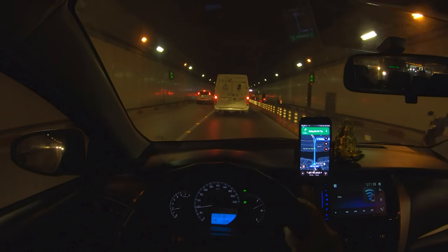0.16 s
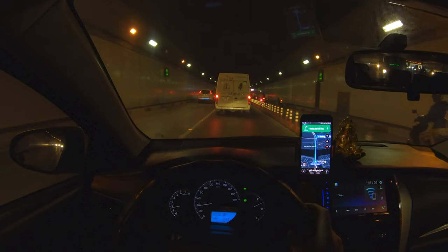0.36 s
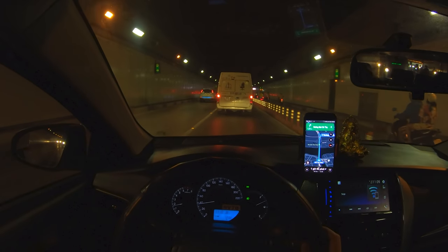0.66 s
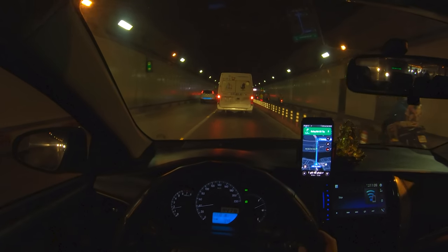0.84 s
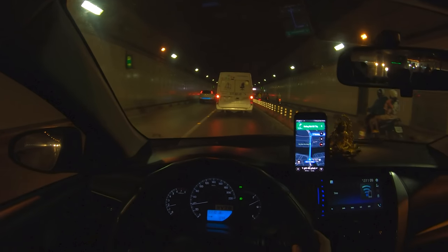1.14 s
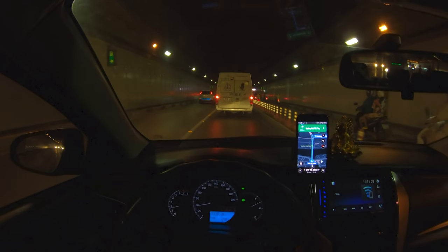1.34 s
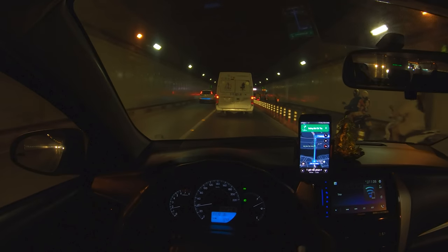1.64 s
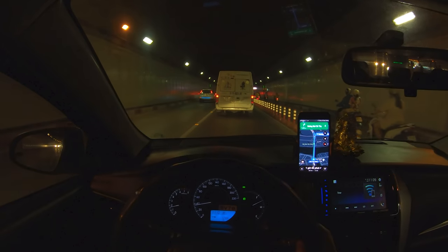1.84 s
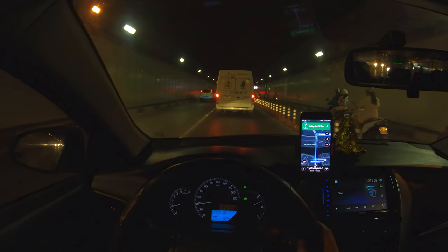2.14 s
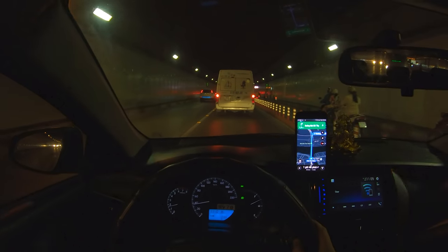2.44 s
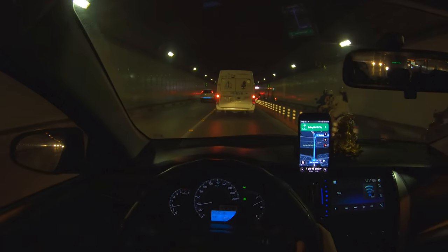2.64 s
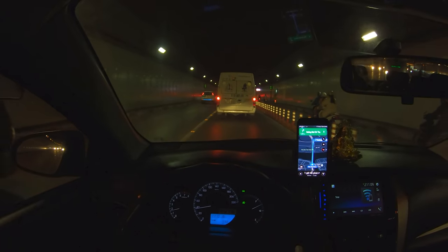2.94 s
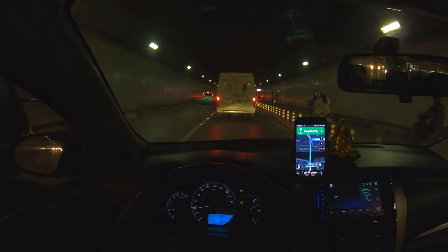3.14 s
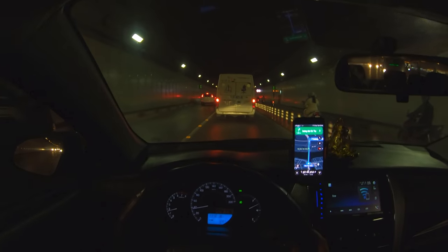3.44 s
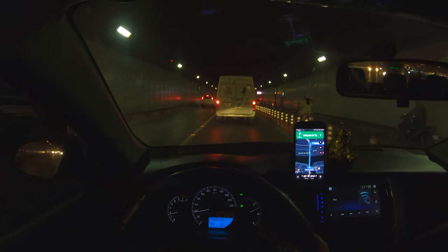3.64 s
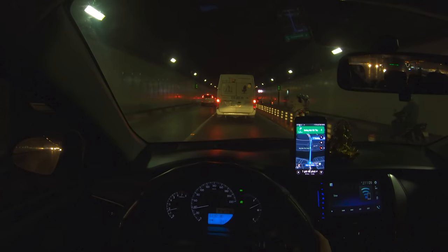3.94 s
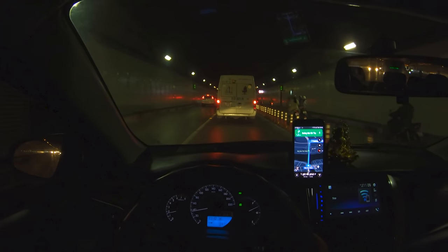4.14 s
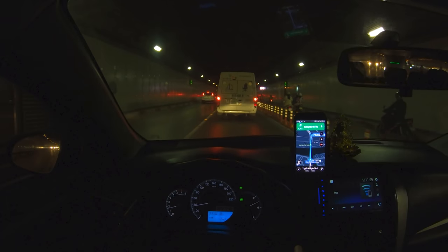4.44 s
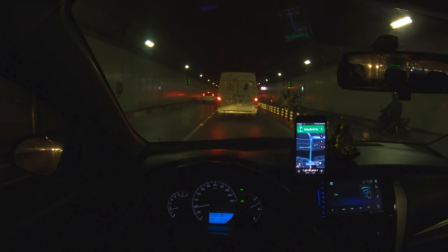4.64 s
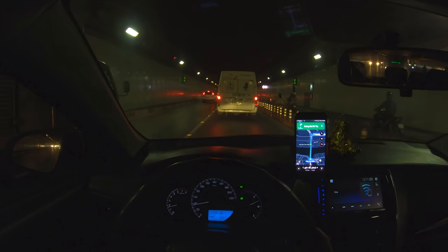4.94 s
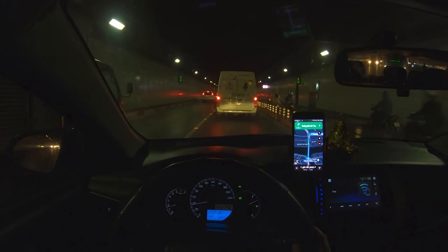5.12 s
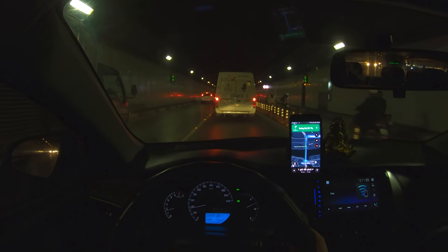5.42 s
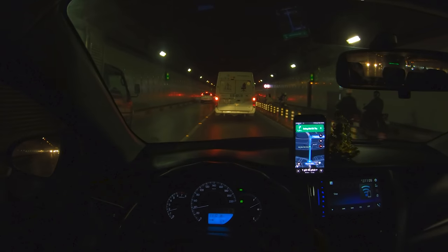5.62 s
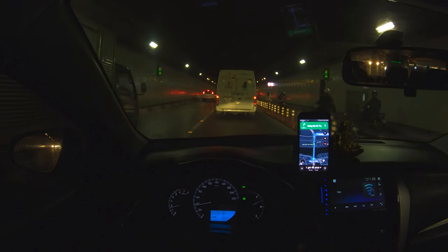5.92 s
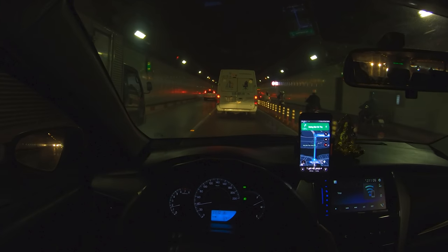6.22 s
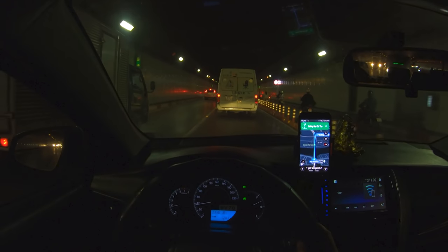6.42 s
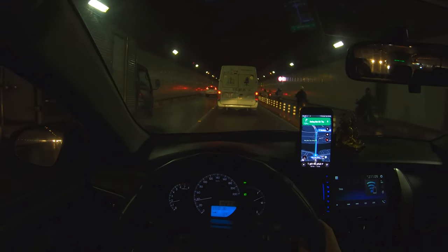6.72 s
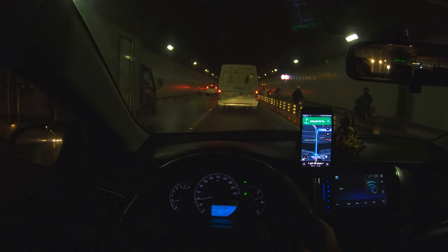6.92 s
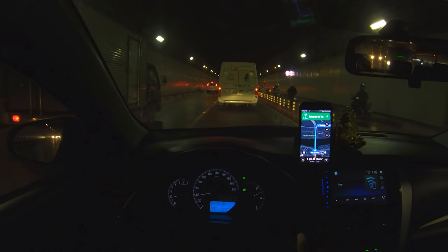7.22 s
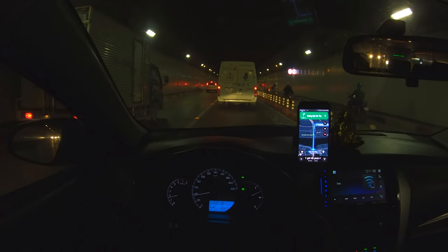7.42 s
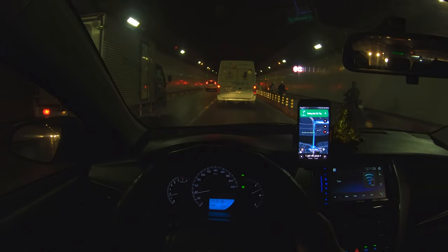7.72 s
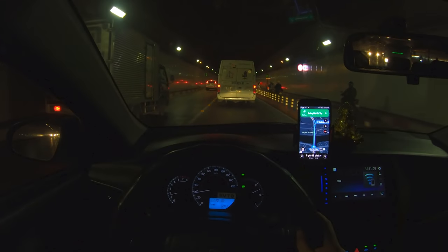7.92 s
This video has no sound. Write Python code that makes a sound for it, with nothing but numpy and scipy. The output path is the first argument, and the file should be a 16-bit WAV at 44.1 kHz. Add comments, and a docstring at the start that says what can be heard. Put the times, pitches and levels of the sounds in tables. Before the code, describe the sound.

Inside a closed car cruising through a road tunnel, deep cabin boom and tyre rumble dominate over a low engine drone and faint wavering hum.

```python
"""A car rolls through a damp road tunnel, heard from the driver's seat with the windows shut.
The road shakes body and cabin resonances into a boom, and noise shaped as tyre rumble lies over it.
The engine is a low drone of sine orders; shaped noise makes the traffic's roar in the tube and the tread's growl and hiss.
A fan, probably the tunnel's ventilation, hums in swells as a blade tone smeared by echoes, with overtones and a rush
of air that fade. Fluttering noise bands make the spray, and swishes, sloshes and drops where the road is wet."""
import sys
import numpy as np
from scipy.fft import rfft, irfft, next_fast_len
from scipy.io import wavfile
from scipy.ndimage import uniform_filter1d, minimum_filter1d, map_coordinates

SR = 44100
rng = np.random.default_rng(int(sys.argv[2]) if len(sys.argv) > 2 else 0)


def generate_wav(sig):
    """Save sig (samples, or channels by samples) to the path in sys.argv[1] as 16-bit PCM at SR."""
    pcm = np.round(np.clip(np.atleast_2d(sig).T, -1, 1) * 32767).astype(np.int16)
    wavfile.write(sys.argv[1], SR, pcm)


N = 355887

# Dampness of the road. Each row: time in seconds, lift it gives the fine spray in dB.
DAMPNESS = [(0, 1.5), (1.1, 1), (1.6, 3.5), (2.05, 3), (2.28, 6), (2.37, -.5), (2.47, 2.5), (3, 4.5),
            (3.7, 3.5), (4.1, -0.5), (5.3, 4), (6, 1.5), (6.7, 4), (7.8, 1.5)]
# Wet patches under the tyres. Each row: start in seconds, length in seconds, spray level in dB, swish level in dB.
WET_PATCHES = [(1.256, 0.026, -72, -61), (1.315, 0.018, -71.5, -63), (1.53, .04, -76, -66),
               (1.605, .025, -72, -67), (1.78, .012, -73, -71), (2.12, 0.086, -70, -65),
               (2.22, .04, -70, -63), (2.295, .016, -71, -67), (2.425, .03, -71, -68),
               (2.543, 0.066, -71, -67.5), (2.71, .05, -78, -66), (2.775, 0.049, -68, -64),
               (3.16, .025, -67, -74), (3.22, .02, -69, -72), (3.34, .09, -76, -72),
               (3.573, .26, -75.5, -70.5), (5.66, .16, -74, -77), (6.077, .035, -73.5, -72),
               (6.359, 0.28, -72.5, -72), (6.81, .04, -69, -70.5), (6.89, 0.038, -71, -70.5),
               (7.09, 0.24, -73, -71), (7.47, 0.091, -70, -69), (7.96, .1, -74, -78)]
# time a tyre takes to run into a patch, and decay time of its water afterwards (s)
PATCH_RISE_S, PATCH_TAIL_S = 0.013, 0.02


def amp(db):
    """Decibels to gain."""
    return 10 ** (np.asarray(db) / 20)


def unit(x):
    """Scale to rms 1."""
    return x / np.sqrt(np.mean(np.abs(x) ** 2) + 1e-20)


def curves(rows):
    """One value per sample for each column after the time."""
    seconds, *columns = np.transpose(rows)
    return [np.interp(np.arange(N) / SR, seconds, column) for column in columns]


def wobble(rate):
    """A smooth random curve at rms 1, with rate knots a second."""
    knots = rng.standard_normal(int(N * rate / SR) + 4)
    return unit(map_coordinates(knots, [np.arange(N) * rate / SR]))


def filtered(x, response):
    """x passed through a response given as a function of frequency in Hz."""
    size = next_fast_len(N + SR // 2)
    spectrum = rfft(x, size) * response(np.fft.rfftfreq(size, 1 / SR))
    return irfft(spectrum, size)[:N]


def coloured(x, spectrum):
    """x shaped by (Hz, dB) points on a log frequency axis, at rms 1."""
    points_hz, points_db = np.transpose(spectrum)

    def response(hz):
        return amp(np.interp(np.log(hz + 1), np.log(points_hz), points_db, left=-120, right=-120))

    return unit(filtered(x, response))


def steadied(x, seconds):
    """x with its swells longer than the given time evened out by its running rms."""
    power = np.abs(uniform_filter1d(x * x, int(seconds * SR) + 1))
    return x / np.sqrt(power + 1e-9)


def swells(rows, rise_s, tail_s):
    """Gain of (start s, length s, dB) events that rise, hold and die away, added by power."""
    t = np.arange(0, N, 20) / SR  # every 20th sample is enough
    power = 0
    for start, length, db in rows:
        rise = np.clip(0.5 + (t - start) / rise_s, 0, 1)  # half way up at the start time
        decay = np.exp(-np.clip((t - start - length) / tail_s, 0, 20))
        power = power + (amp(db) * rise * decay) ** 2
    return np.interp(np.arange(N) / SR, t, np.sqrt(power))


def echoes(phase, spread_hz, direct):
    """A tone plus its many reflections, each Doppler-shifted a little by the car's motion: a random fading sum."""
    scatter = unit(wobble(2 * spread_hz) + 1j * wobble(2 * spread_hz))
    return unit(np.real((direct + scatter) * np.exp(1j * phase)))


def bass_swing_db():
    """Swing of the deep bass about its mean, shared by cabin boom and engine drone."""
    # Each row: time in seconds, deep bass level in dB (only the swing about the mean counts).
    bass_level = [(0, -20.5), (1.02, -20), (1.42, -24.5), (1.75, -20), (2.2, -14.5), (2.45, -21.5),
                  (2.95, -18.5), (3.22, -21), (3.82, -17), (4.23, -21.5), (4.47, -15.5), (4.9, -24.5),
                  (5.2, -18), (5.95, -18), (6.27, -22), (7.42, -15), (8.07, -20)]
    db, = curves(bass_level)
    return db - db.mean()


def cabin_boom():
    """Uneven asphalt shakes the low resonances of body and cabin, through a suspension that softens the top."""
    # Each row: resonance in Hz, width in Hz, relative level in dB.
    resonances = [(26, 2.9, -6.5), (32.76, 4.5, -0.5), (43.2, 8, -0.5), (52.1, 11, -1.5)]
    mean_db, follows = -19.5, 0.91  # follows: part of the bass swing taken over

    def modes(f):
        total = 0
        for k, (centre, width, db) in enumerate(resonances):
            mode = 1j * f * width / (centre * centre - f * f + 1j * f * width)
            total = total + (-1) ** k * amp(db) * mode  # neighbours in opposite polarity
        return total

    def suspension(f):
        return 1 / (1 + (f / 85) ** 4)

    shaken = unit(filtered(rng.standard_normal(N), lambda f: modes(f) * suspension(f)))
    return amp(mean_db + follows * bass_swing_db()) * steadied(shaken, seconds=0.22)


def tyre_rumble():
    """Road texture drums through the tyres into the floor, louder on coarse asphalt."""
    # Each row: frequency in Hz, relative level in dB per Hz.
    rumble_spectrum = [(10, -14), (20, -9.5), (40, -12.5), (60, -3), (68, -5), (80, -2.5), (95, 1),
                       (112, -1), (128, -2), (183, -9), (197, -13.5), (220, -17.5), (300, -23.5),
                       (600, -49.5)]
    # Coarseness of the asphalt. Each row: time in seconds, lift it gives the rumble in dB.
    coarseness = [(0, 0.5), (.4, 1), (1.1, -0.7), (1.8, 1.5), (2.15, -1.3), (3.13, -1.5), (3.48, 2.1),
                  (3.8, -1), (4.0, -1.1), (4.25, 1), (4.5, -0.8), (4.9, 1.5), (5.25, 0.5), (5.55, 0.7),
                  (6.1, -1.3), (6.35, .7), (6.9, 0), (7.25, -2.5), (7.55, -1.5), (7.75, -.3), (8.07, -2.5)]
    rumble_db = -20.5
    coarse_db, = curves(coarseness)
    rumble = steadied(coloured(rng.standard_normal(N), rumble_spectrum), seconds=0.23)
    return amp(rumble_db + coarse_db) * rumble


def engine():
    """Sine orders of the firing rate at low revs make a drone; now and then one of them stands out."""
    # Each row: time in seconds, firing rate in Hz before a small random jitter.
    firing_rate = [(0, 46.3), (.45, 48), (.95, 45.2), (1.35, 46.6), (1.7, 46.6), (2.3, 44.3), (4.1, 44.55),
                   (5.4, 46.8), (5.8, 47), (6.4, 45.3), (7.6, 44.4), (8.07, 43)]
    # Each row: multiple of the firing rate, relative level in dB.
    orders = [(1, 1), (2, -17), (3, -14), (4, -20.5)]
    # Each row: start in seconds, length in seconds, multiple of the firing rate, level in dB.
    order_swells = [(0.18, 0.72, 2, -26.5), (.95, 0.33, 2, -26.5), (.1, 1.5, 4, -34.5),
                    (5.4, 0.39, 3, -28.5), (5.4, 0.46, 4, -34.5), (6.25, .45, 2, -28)]
    mean_db, follows = -24, 1.5  # follows: bass swing is exaggerated by this factor
    rise_s, tail_s = 0.3, 0.12

    firing_hz, = curves(firing_rate)
    phase = 2 * np.pi * np.cumsum(firing_hz * (1 + 0.012 * wobble(7))) / SR
    drone = 0
    for multiple, db in orders:
        tone = np.sin(multiple * phase + rng.uniform(0, 2 * np.pi))
        drone = drone + amp(db + 1.2 * wobble(6.8)) * tone
    strands = 0
    for start, length, multiple, db in order_swells:
        tone = unit(np.sin(round(multiple) * phase + rng.uniform(0, 2 * np.pi)))
        strands = strands + swells([(start, length, db)], rise_s, tail_s) * tone
    return amp(mean_db + follows * bass_swing_db()) * unit(drone) + strands


def tunnel_roar():
    """Traffic noise, blurred by the tube and dulled by the glass, slowly swelling."""
    # Each row: frequency in Hz, relative level in dB per Hz.
    roar_spectrum = [(250, -25.5), (480, -4.5), (550, -3.5), (615, -3.5), (720, -5.5), (800, -5.5),
                     (880, -6), (950, -8), (1020, -6.5), (1130, -10), (1400, -16.8), (1850, -19),
                     (2000, -19.5), (2500, -25.5), (3200, -30), (4800, -41.5), (6200, -58.5)]
    # Swell of the surrounding traffic. Each row: time in seconds, lift in dB.
    traffic = [(0, 0), (1.2, -0.2), (3.1, .5), (4.15, -0.8), (5.2, 1), (5.9, -0.6), (6.8, 0.5), (7.5, -1),
               (7.68, -2), (8.07, -1.9)]
    roar_db = -42
    traffic_db, = curves(traffic)
    unsteady = amp(0.29 * wobble(7.4))
    return amp(roar_db + traffic_db) * unsteady * coloured(rng.standard_normal(N), roar_spectrum)


def fan():
    """The blade tone wavers and comes in swells; its overtones and the rush of air each fade in their own way."""
    # The hum wavers as the car moves through its echoes. Each row: time in seconds, pitch in Hz.
    hum_pitch = [(0, 290), (.3, 286), (.65, 291.5), (1.6, 288.5), (2.5, 291), (3.9, 289.5), (4.4, 292),
                 (4.9, 287.5), (5.3, 290), (8.07, 288.5)]
    # Each row: start in seconds, length in seconds, level of the hum in dB.
    hum_swells = [(.01, 0.043, -31.5), (.17, 0.14, -34), (.32, 0.071, -27), (.53, 0.083, -26.5),
                  (.96, .19, -33.5), (1.26, 0.22, -33.5), (1.83, 0.32, -39.5), (2.14, 0.097, -32.5),
                  (2.28, .3, -30), (2.7, 0.085, -33.5), (3.82, 0.06, -29), (3.97, 0.11, -36),
                  (4.8, .16, -30.5), (5.21, 0.08, -33.5), (5.39, 0.081, -29), (6.48, 0.19, -35),
                  (6.84, 0.15, -35.5), (7.93, 0.15, -37.5)]
    # Each row: start in seconds, length in seconds, level of the hum's octave in dB.
    octave_swells = [(.08, .09, -45.5), (.4, 0.13, -44), (2.17, .05, -46), (2.41, 0.065, -47),
                     (2.97, 0.069, -47), (3.17, .06, -43), (3.48, .05, -47), (6.35, .08, -47.5)]
    # Each row: multiple of the blade rate, starting level in dB, fading as the fan falls behind in dB per second.
    fan_overtones = [(2, -51, 0.7), (3, -60.5, 0.5), (4, -59.5, 0.5), (5, -67, .5), (6, -74.5, 0.5)]
    # The rush of air. Each row: frequency in Hz, relative level in dB per Hz.
    wash_spectrum = [(520, -24.5), (580, -0.5), (610, 0), (665, -4.5), (740, -22)]
    blade_hz = 289.2  # mean rate, for the overtones
    hum_db, hum_fade_db_per_s = -40.5, 1.2  # between swells, at the start
    wash_db, wash_fade_db_per_s = -46.5, 0.55
    rise_s, tail_s = 0.08, 0.042

    t = np.arange(N) / SR
    hum_floor = amp(hum_db - hum_fade_db_per_s * t)
    hum_level = np.hypot(hum_floor, swells(hum_swells, rise_s, tail_s))
    hum_hz, = curves(hum_pitch)
    phase = 2 * np.pi * np.cumsum(hum_hz) / SR
    hum = hum_level * steadied(echoes(phase, spread_hz=7, direct=1.8), seconds=0.06)
    octave = swells(octave_swells, rise_s, tail_s) * unit(np.sin(2 * phase))
    overtones = 0
    for k, db, fade in fan_overtones:
        tone = echoes(2 * np.pi * k * blade_hz * t, spread_hz=2.4 * k, direct=0.8)
        overtones = overtones + amp(db - fade * t) * tone
    wash = amp(wash_db - wash_fade_db_per_s * t) * coloured(rng.standard_normal(N), wash_spectrum)
    return hum + octave + overtones + wash


def easing_db():
    """Change of the tread noise, which dies down steadily once the car eases off."""
    ease_s, ease_db_per_s = 6.9, 1.5
    return -ease_db_per_s * np.maximum(np.arange(N) / SR - ease_s, 0)


def tread():
    """The tread blocks growl on the asphalt and squeeze out a hiss of air, louder where the road is damp."""
    # Each row: frequency in Hz, relative level in dB per Hz.
    growl_spectrum = [(170, -13), (250, 3), (315, 1.5), (370, -2), (440, -5), (490, -6), (550, -10.5),
                      (800, -25.5), (1500, -56.5)]
    # Each row: frequency in Hz, relative level in dB per Hz.
    hiss_spectrum = [(1500, -20.5), (2400, -1.5), (2850, 3), (3700, 0.8), (4700, -2.5), (5400, -10),
                     (5900, -18), (8000, -36)]
    growl_db, growl_follows = -35.5, 0.27  # mean level before easing, part of the damp lift taken over
    hiss_db, hiss_follows = -61, 0.5  # level at zero lift, part of the damp lift taken over

    damp_db, = curves(DAMPNESS)
    growl_level = growl_db + growl_follows * (damp_db - damp_db.mean()) + 0.36 * easing_db()
    growl = amp(growl_level + 0.39 * wobble(2.4)) * coloured(rng.standard_normal(N), growl_spectrum)
    hiss_level = hiss_db + hiss_follows * damp_db + 0.6 * easing_db()
    hiss = amp(hiss_level + 0.4 * wobble(22)) * coloured(rng.standard_normal(N), hiss_spectrum)
    return growl + hiss


def spray():
    """The damp road throws up a fluttering mist with a light patter of drops, more of it in the wet patches."""
    # Each row: frequency in Hz, relative level in dB per Hz.
    fizz_spectrum = [(3000, -14), (4900, 2), (5900, -2), (6600, 1), (7900, 0.5), (8800, -9), (10000, -18),
                     (12000, -39.5)]
    spray_db = -77  # at zero lift, outside the patches
    damp_db, = curves(DAMPNESS)
    patch_rows = [(start, length, db) for start, length, db, _ in WET_PATCHES]
    patches = swells(patch_rows, PATCH_RISE_S, PATCH_TAIL_S) * amp(1.2 * wobble(90))
    drops = unit(rng.choice([-1, 1], N) * (rng.random(N) < 500 / SR))  # about 500 clicks a second
    water = rng.standard_normal(N) + 0.4 * drops
    level = np.hypot(amp(spray_db + damp_db), patches)
    flutter = amp(0.96 * wobble(45))
    return level * flutter * coloured(water, fizz_spectrum)


def swishes():
    """Water sheets off the tread in short fluttering swells, sloshes where it lies deeper and flings single drops."""
    # Each row: frequency in Hz, relative level in dB per Hz.
    swish_spectrum = [(3000, -22.5), (4000, -3.5), (4800, 0.5), (5450, -3), (5900, -15), (8000, -23)]
    # Deeper films of water. Each row: start in seconds, length in seconds, level in dB.
    deep_films = [(1.26, .2, -64), (1.54, .05, -57), (1.68, 0.52, -62.5), (2.72, .08, -60),
                  (3.55, .12, -64), (4.32, 0.074, -62.5)]
    # Each row: frequency in Hz, relative level in dB per Hz.
    slosh_spectrum = [(1200, -22.5), (2100, -3), (2800, -0.5), (3400, -5.5), (4500, -18), (6000, -36.5)]
    # Single drops flung against the wheel arch. Each row: start in seconds, level in dB.
    flung_drops = [(2.181, -53.5), (5.32, -63), (6.375, -61.5)]
    # Each row: frequency in Hz, relative level in dB per Hz.
    drop_spectrum = [(1500, -12), (3500, -5), (4600, 1), (5100, 3), (6000, -14), (8600, -13.5),
                     (10000, -29)]

    patch_rows = [(start, length, db) for start, length, _, db in WET_PATCHES]
    sheet_level = swells(patch_rows, PATCH_RISE_S, PATCH_TAIL_S) * amp(1.2 * wobble(110))
    sheets = sheet_level * coloured(rng.standard_normal(N), swish_spectrum)
    slosh_level = swells(deep_films, rise_s=0.03, tail_s=0.03)
    slosh = slosh_level * coloured(rng.standard_normal(N), slosh_spectrum)
    drop_rows = [(start, 0.004, db) for start, db in flung_drops]  # each holds for 4 ms
    drop_level = swells(drop_rows, rise_s=0.002, tail_s=0.009)
    drops = drop_level * coloured(rng.standard_normal(N), drop_spectrum)
    return sheets + slosh + drops


def scene():
    """Everything that reaches the driver's seat."""
    road = cabin_boom() + tyre_rumble()
    tunnel = tunnel_roar() + fan()
    wet = spray() + swishes()
    return (road + engine() + tunnel + tread() + wet)[None]


def record(dry):
    """A compressor evens out the bass, a limiter holds the peaks down and a steep low-pass ends the band."""
    split_hz, average_s, makeup_db = 180, 0.05, 2
    threshold_db, squeeze = -24, 0.34  # squeeze: share of the excess removed
    ceiling, hold_s, top_hz = 0.42, 0.016, 9750

    bass = filtered(dry[0], lambda hz: 1 / (1 + (hz / split_hz) ** 8))
    power = np.abs(uniform_filter1d(bass * bass, int(average_s * SR) + 1))
    level_db = 10 * np.log10(power + 1e-9)
    bass_gain = amp(makeup_db - squeeze * np.maximum(level_db - threshold_db, 0))
    even = dry[0] - bass + bass * bass_gain

    needed = np.minimum(1, ceiling / (np.abs(even) + 1e-9))
    hold = int(hold_s * SR)
    gain = uniform_filter1d(minimum_filter1d(needed, hold), hold)
    samples = np.arange(N)
    fade = np.clip(np.minimum(samples, samples[::-1]) / (0.004 * SR), 0, 1)  # 4 ms at both ends
    return filtered(even * gain * fade, lambda hz: 1 / np.sqrt(1 + (hz / top_hz) ** 80))[None]


dry = scene()
out = record(dry)
generate_wav(out)
```